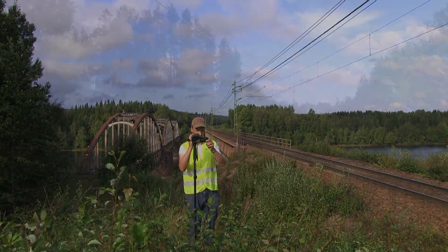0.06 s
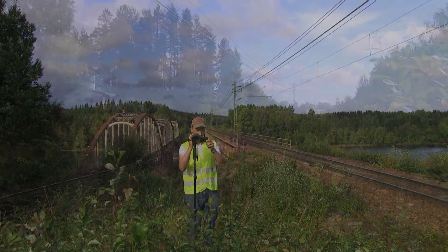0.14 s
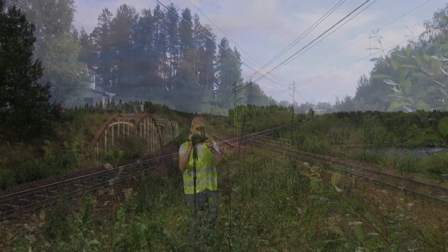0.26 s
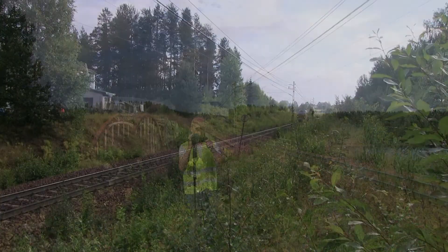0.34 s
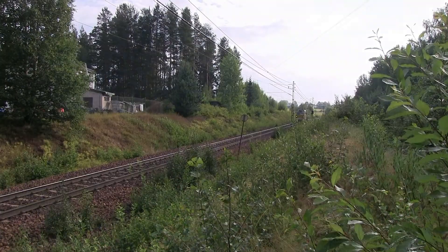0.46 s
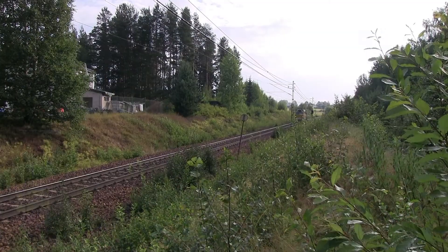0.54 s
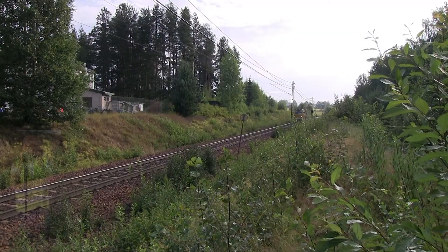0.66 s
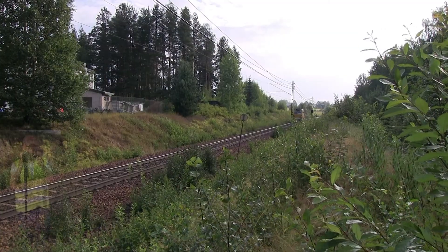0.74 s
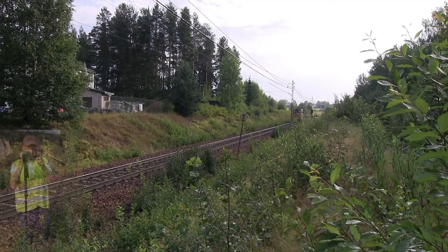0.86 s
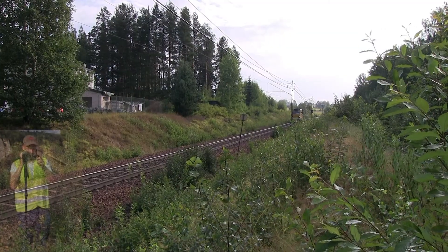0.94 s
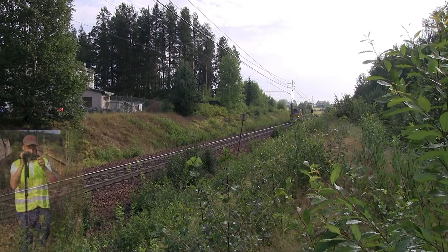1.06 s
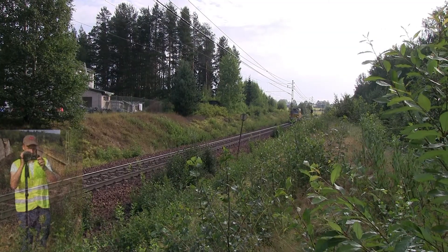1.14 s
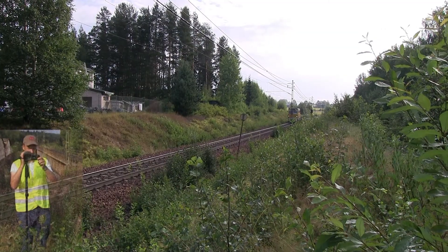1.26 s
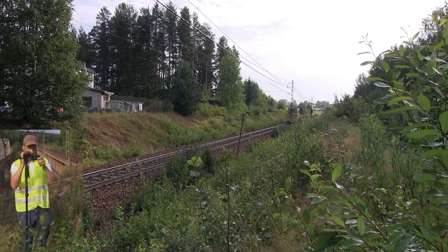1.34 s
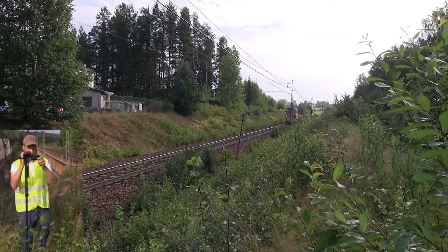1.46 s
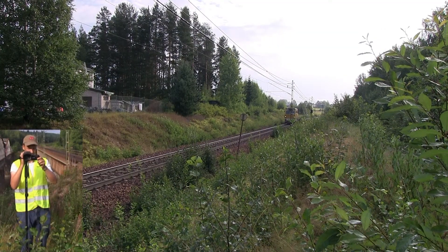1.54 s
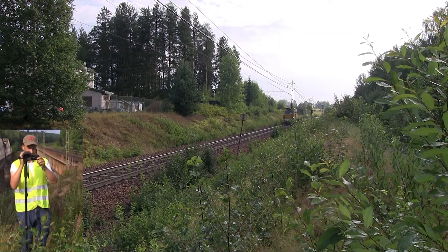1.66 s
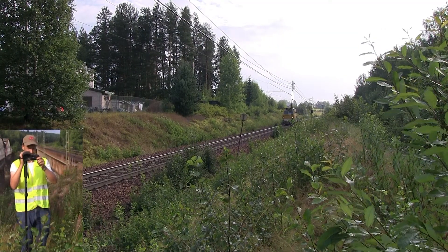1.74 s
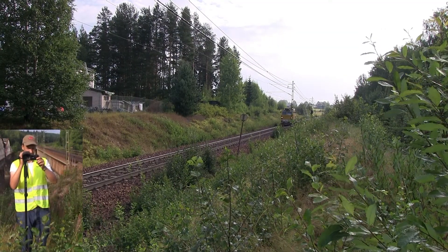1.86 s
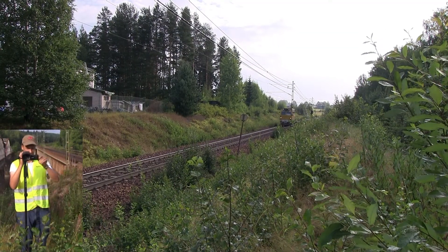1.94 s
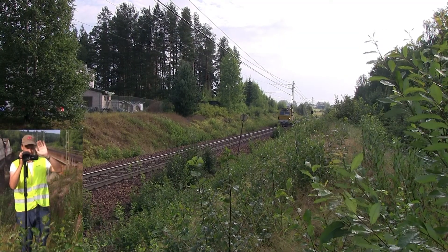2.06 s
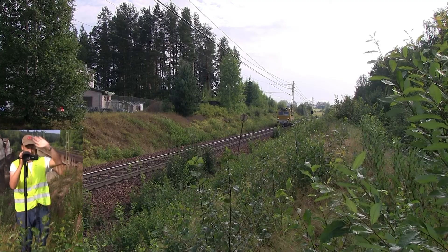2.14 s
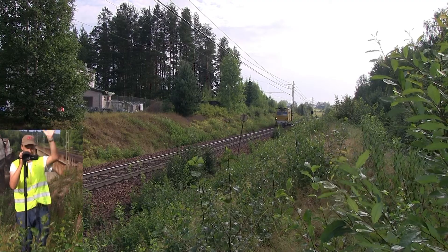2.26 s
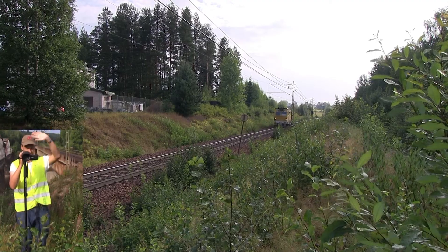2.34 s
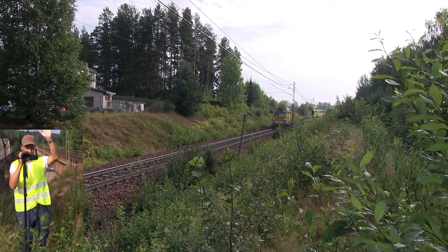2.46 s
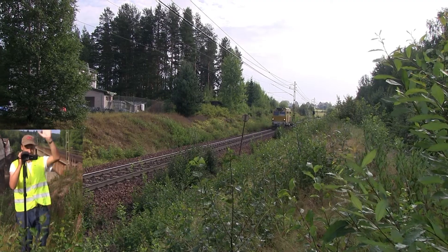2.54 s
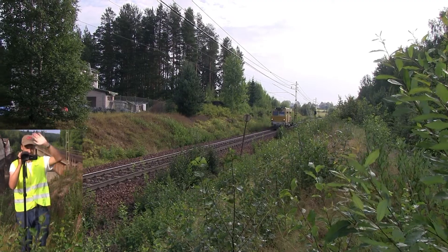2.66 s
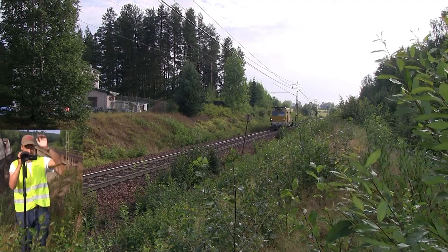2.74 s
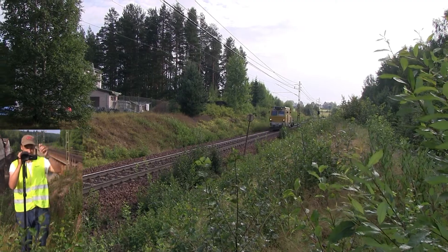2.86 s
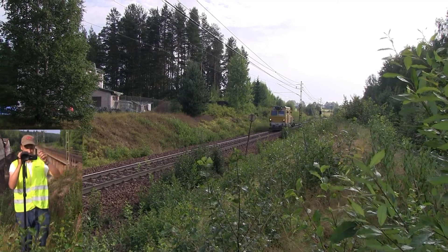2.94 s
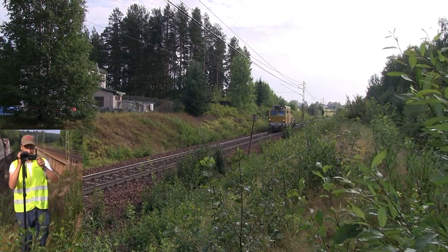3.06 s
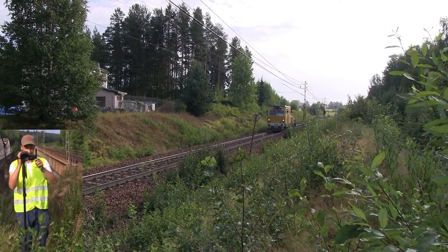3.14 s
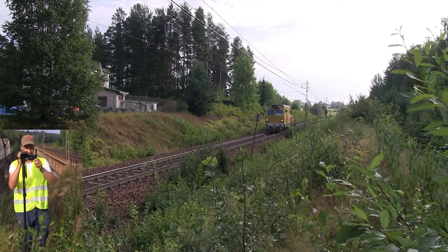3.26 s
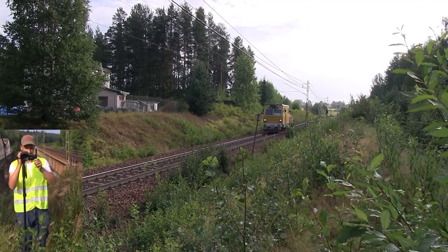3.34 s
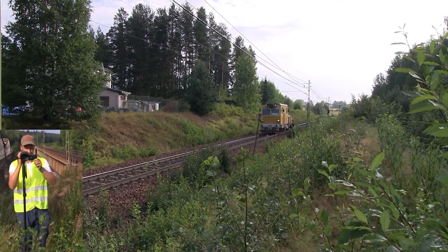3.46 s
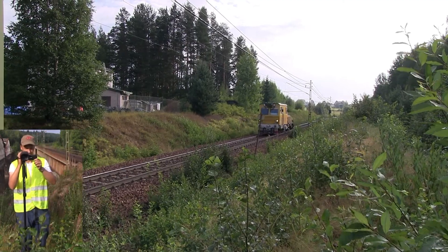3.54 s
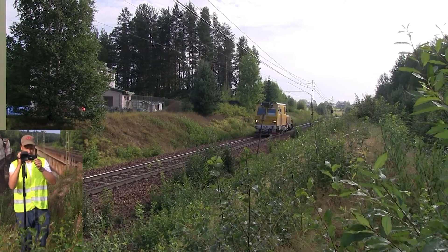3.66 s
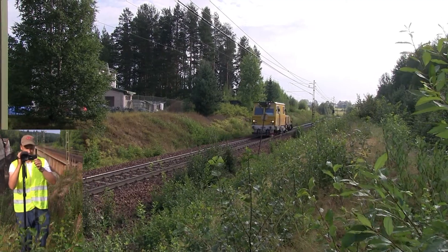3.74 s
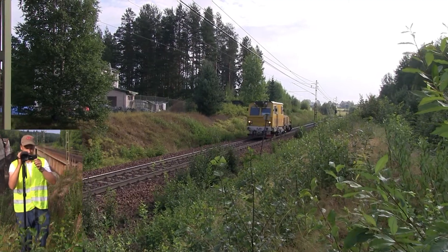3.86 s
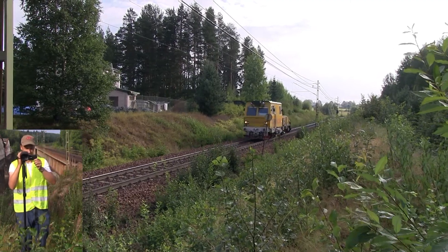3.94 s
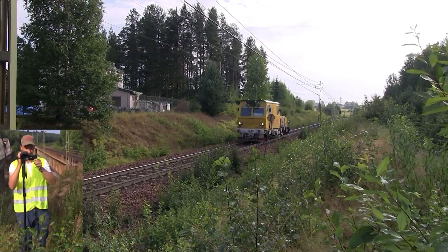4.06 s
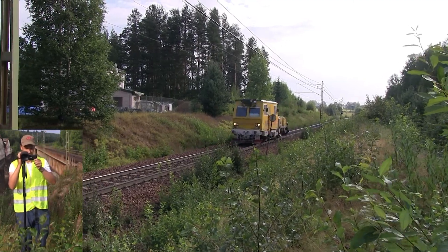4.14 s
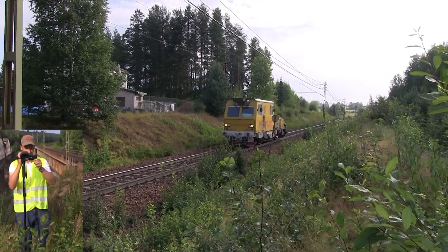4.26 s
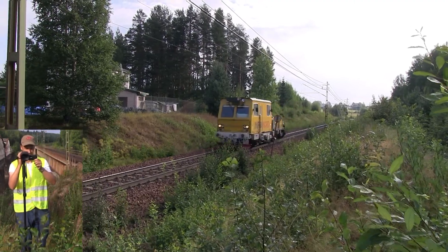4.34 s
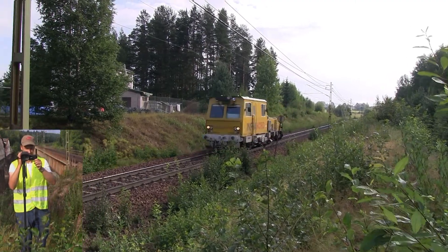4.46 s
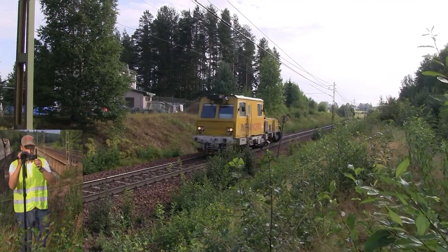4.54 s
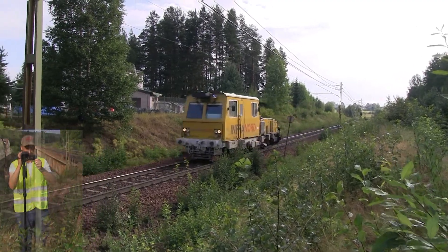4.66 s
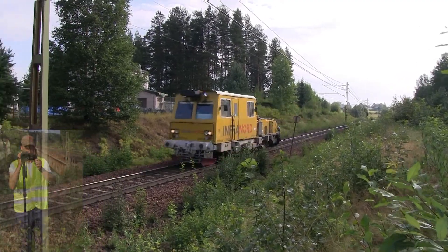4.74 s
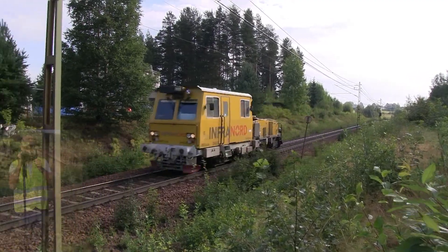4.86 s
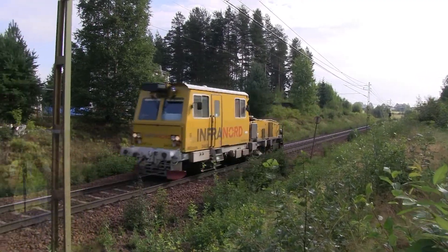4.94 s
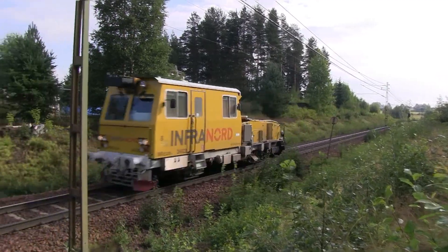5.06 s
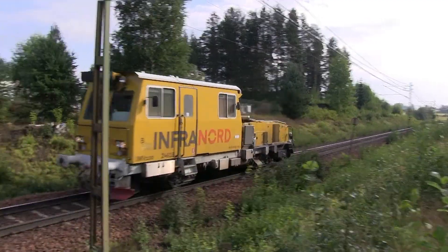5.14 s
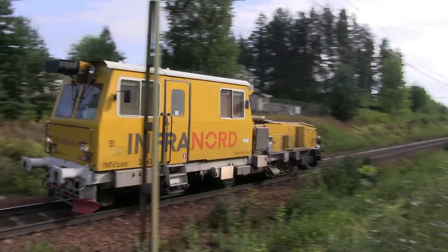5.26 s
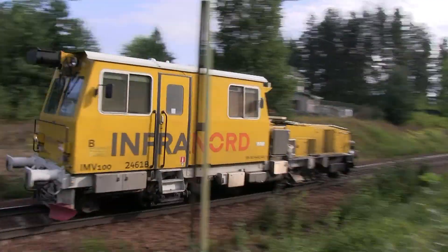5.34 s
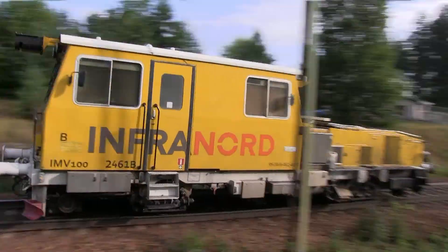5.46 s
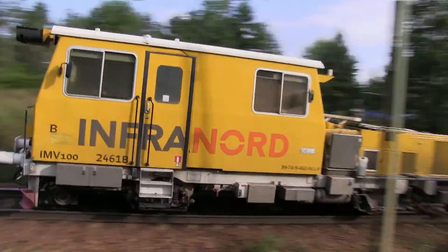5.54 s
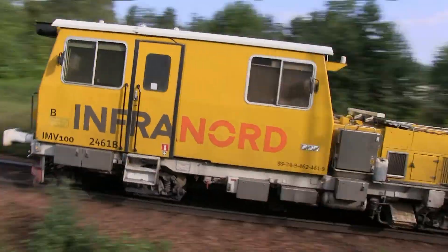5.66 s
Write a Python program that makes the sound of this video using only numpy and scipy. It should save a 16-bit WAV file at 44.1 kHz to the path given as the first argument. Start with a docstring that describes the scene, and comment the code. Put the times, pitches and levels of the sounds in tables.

```python
"""A diesel track railcar approaches along a wooded cutting: first a throbbing engine hum of sines at
multiples of two rates, wheel roar, singing rails and a high chirr of shaped noise, over faint open-air hiss.
The engine eases off, gear whines come and go as wavering sines, and the rails ping once as a falling chirp.
Three short toots follow on two horns, each a stack of harmonics, and the trees throw them back.
Engine, wheels, singing rails and chirr swell as the distance shrinks, until the car draws level."""
import sys
import numpy as np
from scipy import signal
from scipy.fft import rfft, irfft, next_fast_len
from scipy.io import wavfile
from scipy.ndimage import uniform_filter1d, map_coordinates

SR = 44100
rng = np.random.default_rng(int(sys.argv[2]) if len(sys.argv) > 2 else 0)


def generate_wav(sig):
    """Save sig (samples, or channels by samples) to the path in sys.argv[1] as 16-bit PCM at SR."""
    pcm = np.round(np.clip(np.atleast_2d(sig).T, -1, 1) * 32767).astype(np.int16)
    wavfile.write(sys.argv[1], SR, pcm)


N = 251370

# the pass: the car's speed, its nearest distance and the moment it draws level
SPEED_M_PER_S, NEAREST_M, LEVEL_AT_S = 17.36, 6.77, 5.425

# faint steady hiss of the open air: its level and its spectrum [f/Hz, level/dB]
AIR_DB = -65
AIR_SPECTRUM = [(500, 0), (2000, 2), (4500, -10), (8000, -7), (12000, -1), (14500, -9)]

# the high chirr: its level when the car is nearest, and its loss along the track
CHIRR_DB, CHIRR_LOSS_DB_PER_M = -44, 0.23
# spectrum of the chirr [f/Hz, level/dB]
CHIRR_SPECTRUM = [(1000, -45), (3500, -21), (5800, -14), (6400, 0), (6800, -1), (7300, -10), (7750, -8),
                  (8300, -17), (9700, -15), (11800, -19), (14300, -28)]
# thin lines in the chirr [f/Hz, width/Hz, level/dB]
CHIRR_LINES = [(6360, 90, 2), (6550, 90, -2), (9650, 90, -6), (10880, 90, -7), (11800, 70, -8)]

# sources on the car: level when nearest, and loss for each doubling of the distance
EXHAUST_DB, EXHAUST_LOSS_DB = -17.5, 7.5
DRONE_DB, DRONE_LOSS_DB = -22, 5.5
SHAFT_DB, SHAFT_LOSS_DB = -32, 3.8
ROAR_DB, ROAR_LOSS_DB = -17.5, 6.5
RUMBLE_DB, RUMBLE_LOSS_DB = -29.5, 7.0
HISS_DB, HISS_LOSS_DB = -22.5, 7.6

# engine rates over time [t/s, firing f/Hz, shaft f/Hz]
ENGINE_RATES = [(0, 101.2, 40.6), (.8, 100.5, 40.6), (2.2, 99.3, 40.5), (4, 98, 40.5), (5, 96.8, 40.35),
                (5.7, 95.7, 40)]
IN_STEP_AT_S = 5.235  # exhaust and drone are in step at this moment
# the engine pulls at first, then eases off: when, how fast, and what the load adds to exhaust and drone
EASE_AT_S, EASE_S, LOAD_EXHAUST_DB, LOAD_DRONE_DB = 1.08, 0.51, 12.5, -8
DRONE_LEAD_S = 0.47  # the drone comes up this much before the exhaust drops
# the bank screens the engine until the car comes clear of it: when, how fast, by how much
CLEAR_AT_S, CLEAR_S, SCREEN_DB = 3.3, .35, -4
# exhaust overtones [multiple of the firing rate, level/dB before they open up]
EXHAUST_OVERTONES = [(2, -12), (3, -15.5), (4, -24)]
# overtones of the drone [multiple of the shaft rate, level/dB]
DRONE_OVERTONES = [(2.879, -17), (2.999, -14), (3.851, -14.5)]

# low shake of the track bed under the wheels [f/Hz, level/dB]
RUMBLE_SPECTRUM = [(20, -16), (35, -7), (60, -3), (130, -3), (220, -20.5), (400, -49), (800, -100)]
# rolling roar [f/Hz, level/dB]
ROAR_SPECTRUM = [(74, -35), (125, -11.5), (260, -6.5), (345, -4), (377, -1), (408, -9), (456, -0.5),
                 (638, -4.5), (754, 1), (815, -8.5), (932, -4), (1260, -17), (1460, -10.5), (1800, -16.5),
                 (2340, -55), (3960, -120)]
# rolling hiss [f/Hz, level/dB]
HISS_SPECTRUM = [(760, -29), (1300, -6.5), (1480, -7.5), (1670, -16.5), (1910, -6), (2260, -9.5),
                 (2860, -9), (3830, -17), (4190, -16), (5030, -20), (6600, -20.5), (8240, -30.5),
                 (11800, -47), (14500, -66)]
# panels and bogies ringing within the roar [f/Hz, width/Hz, level/dB]
BODY_MODES = [(157.2, 12, -3.5), (480.5, 33, 4), (1039, 44, -4), (1370, 19, -9), (1524, 45, -11),
              (2947, 60, -8), (4200, 80, -16)]

# the singing rails: level when the car is nearest, and loss along the track
SINGING_DB, SINGING_LOSS_DB_PER_M = -25, 0.0544
# rail song, with stop bands between its pass bands [f/Hz, level/dB]
RAIL_SPECTRUM = [(25, -24), (60, -18), (130, -25), (255, -27), (320, -12), (420, 1), (438, -2), (452, -22),
                 (482, -5), (592, -6), (610, -20), (640, -8), (900, -11), (1110, -7), (1368, -11),
                 (1398, -30), (2800, -39), (5000, -51), (14000, -80)]
# sharpest resonances of the rails [f/Hz, width/Hz, level/dB]
RAIL_RESONANCES = [(405.1, 9, -1.5), (430, 35, -2.5), (517.9, 9.2, -3.5)]
# wheel knocks on the track [t/s, level/dB before the common trim]
WHEEL_KNOCKS = [(.045, -29), (.39, -31), (.45, -26), (.52, -28), (1.76, -29), (4.088, -20.5), (5.49, -22)]
KNOCK_TRIM_DB = -2
# the rails' answer to a knock [f/Hz, level/dB]
CLONK_SPECTRUM = [(60, -40), (300, -14), (410, 2), (460, -11), (700, -7), (1100, -7), (1370, -8),
                  (1420, -26), (2150, -31), (3000, -40), (6000, -56), (14000, -85)]

# gear tones riding on the engine speed
# [opening t/s, end t/s, multiple of the firing rate, level/dB before the common trim]
GEAR_TONES = [(1.1, 1.9, 7.99, -36), (2.15, 2.78, 7.95, -35), (2.08, 2.2, 7.04, -34),
              (3.6, 5.4, 7.08, -32.5), (4.52, 4.7, 10.9, -31), (4.9, 5.45, 7.71, -28),
              (5.3, 5.8, 3.975, -25), (5, 5.65, 4.7, -29), (4.9, 5.5, 15.7, -37), (4.95, 5.8, 30.5, -37)]
WHINE_TRIM_DB, WHINE_WAVER = 0.26, 0.00521  # common trim, and the share by which the pitch wavers

# chirps that make up the ping [arrival of 1 kHz t/s, level/dB, travel time of 1 kHz t/s]
RAIL_PINGS = [(2.0665, -2.7, .036), (2.075, -9.7, .045)]
# strength of the ping at each pitch [f/Hz, level/dB]
PING_COLOUR = [(290, -45), (370, -14), (450, -13), (560, -17), (750, -7), (1000, 0), (1230, -1),
               (1400, -12), (1600, -29), (2300, -36)]

# the toots at the horns [t/s, length/s, level/dB]
HORN_TOOTS = [(2.782, 0.043, -11.5), (3.246, .054, -11.5), (3.462, 0.057, -10.5)]
# the two horns [settled f/Hz, lag before it speaks t/s, share by which it starts sharp]
HORN_REEDS = [(411.5, 0, .07), (385.5, .004, .19)]
# first harmonics, one row each [high horn level/dB, low horn level/dB]
HORN_HARMONICS = [(-8, -11), (-4, 1), (-6, -10), (-4, -10), (-11, -5), (0, -5), (-4, -10), (-6, -5),
                  (-12, -10)]
# overtones above those [f/Hz, level/dB]
HORN_BLARE = [(3700, -13), (4500, -17), (5500, -17), (7200, -21.5), (8200, -31.5), (9500, -43),
              (12000, -57), (14500, -56)]

# echoes from the trees: the first and strongest comes from beside the track, the last from behind the car
ECHO_FIRST_S, ECHO_LAST_S, ECHO_DB, ECHO_FADE_DB = .022, .24, -11, -11
ECHO_FIRST_RATIO, ECHO_PITCH_DROP = 0.98, .16  # the moving horn reaches the trees at a lower pitch
# time for the trees' reflections to die by 60 dB [f/Hz, t60 t/s]
TREE_DECAY = [(300, 0.82), (1500, 0.98), (3000, 0.71), (7000, 0.92), (13000, 0.88)]

FADE_IN_S, FADE_FROM_DB = .4, -10.5
TOP_HZ = 14500


def amp(db):
    """Decibels to gain."""
    return 10 ** (np.asarray(db) / 20)


def unit(x):
    """Scaled to rms 1."""
    return x / np.sqrt(np.mean(x ** 2) + 1e-20)


def along(points, hz):
    """(Hz, value) points read on a log frequency axis."""
    f, v = np.transpose(points)
    return np.interp(np.log(hz + 1), np.log(f + 1), v)


def clock():
    """The time of each sample in seconds."""
    return np.arange(N) / SR


def curves(rows):
    """One value per sample for each column after the time."""
    s, *columns = np.transpose(rows)
    return [np.interp(clock(), s, column) for column in columns]


def wobble(rate):
    """A smooth random curve, rate knots a second."""
    knots = rng.standard_normal(int(N * rate / SR) + 4)
    return map_coordinates(knots, [clock() * rate])


def turns(hz):
    """The phase of a moving frequency, from a random start."""
    return 2 * np.pi * (np.cumsum(hz) / SR + rng.random())


def gate(start, end, rise, fall):
    """Opens smoothly after start and closes smoothly after end."""
    t = clock()
    opening = np.clip((t - start) / rise, 0, 1)
    closing = np.clip(1 - (t - end) / fall, 0, 1)
    return np.sin(np.pi / 2 * opening * closing) ** 2


def filtered(x, response):
    """x shaped by a response of frequency."""
    m = next_fast_len(N + SR // 2)
    return irfft(rfft(x, m) * response(np.fft.rfftfreq(m, 1 / SR)), m)[..., :N]


def pan(x, left_db):
    """Stereo with the left side louder by left_db."""
    return x * np.array([amp(left_db / 2), amp(-left_db / 2)]).reshape(2, -1)


def widen(mid, side, side_db):
    """Left and right from a middle and a side signal."""
    return np.array([mid + amp(side_db) * side, mid - amp(side_db) * side])


def rush(spectrum, side_db, patchy_db):
    """Stereo noise of rms 1 with patches of random gain in time and pitch."""
    z = signal.stft(rng.standard_normal((2, N)), nperseg=1024)[2]
    field = uniform_filter1d(rng.standard_normal(z.shape[1:]), size=5, axis=0)
    field = uniform_filter1d(field, size=7, axis=1)
    pair = signal.istft(z * amp(patchy_db * unit(field)), nperseg=1024)[1][:, :N]
    # the last factor rolls off the lowest bass
    mid, side = filtered(pair, lambda hz: amp(along(spectrum, hz)) * hz ** 2 / (hz ** 2 + 40 ** 2))
    return unit(widen(mid, side, side_db))


def ringing(modes):
    """Noise of rms 1 through a few resonances."""
    def response(f):
        return sum(amp(db) / np.sqrt(w) * (1j * f * w / (c * c - f * f + 1j * f * w)) ** 2
                   for c, w, db in modes)
    return unit(filtered(rng.standard_normal(N), response))


def scatter(x, t60s, build, side_db):
    """Reflections build up, then each frequency dies at its own speed."""
    hz, t, z = signal.stft(rng.standard_normal((2, SR)), SR, nperseg=256)
    decay = amp(-60 * t / along(t60s, hz)[:, None])
    tail = signal.istft(z * decay * (1 - np.exp(-t / build)), SR, nperseg=256)[1]
    mid, side = signal.fftconvolve(x[None], tail / np.linalg.norm(tail[0]), axes=1)[:, :N]
    return widen(mid, side, side_db)


def distance():
    """Metres from the car to the microphone."""
    return np.hypot(NEAREST_M, SPEED_M_PER_S * (clock() - LEVEL_AT_S))


def through_air(near_db, loss_db):
    """Level in dB of a source on the car: it loses loss_db for each doubling of the distance."""
    return near_db - loss_db * np.log2(distance() / NEAREST_M)


def along_track(near_db, loss_db_per_m):
    """Level in dB of a sound that loses the same for every metre of distance."""
    return near_db - loss_db_per_m * (distance() - NEAREST_M)


def load(until):
    """1 while the engine pulls, falling to 0 as it eases off."""
    return np.clip(1 - (clock() - until) / EASE_S, 0, 1)


def air():
    """Steady shaped noise: the faint hiss under everything."""
    return amp(AIR_DB) * pan(rush(AIR_SPECTRUM, side_db=-11, patchy_db=0), left_db=1.5)


def chirr():
    """A high chirr along the track, noise with thin resonant lines, grows as the car nears."""
    sizzle = rush(CHIRR_SPECTRUM, side_db=-11, patchy_db=2.0) + amp(-9.5) * ringing(CHIRR_LINES)
    level_db = along_track(CHIRR_DB, CHIRR_LOSS_DB_PER_M) + .5 * wobble(25)
    return amp(level_db) * pan(sizzle, left_db=2.0)


def overtones(phase, orders):
    """Sines at multiples of a phase, each wavering in level."""
    return sum(amp(db + 1.6 * wobble(9)) * np.sin(k * phase + 2 * np.pi * rng.random())
               for k, db in orders)


def engine():
    """The exhaust note beats against the drone of the drive, so the hum throbs."""
    exhaust_db = through_air(EXHAUST_DB, EXHAUST_LOSS_DB) + LOAD_EXHAUST_DB * load(EASE_AT_S)
    drone_db = through_air(DRONE_DB, DRONE_LOSS_DB) + LOAD_DRONE_DB * load(EASE_AT_S - DRONE_LEAD_S)
    phases = [turns(hz) for hz in curves(ENGINE_RATES)]
    firing, shaft = [phase - np.interp(IN_STEP_AT_S, clock(), phase) for phase in phases]

    open_db = along_track(near_db=1.0, loss_db_per_m=0.07)  # overtones come through as the car nears
    exhaust = np.sin(firing) + amp(open_db) * overtones(firing, EXHAUST_OVERTONES)
    # a line halfway between the two makes every second throb stronger
    halfway = amp(-5.5) * np.sin(firing / 2 + shaft)
    drone = np.sin(2 * shaft) + halfway + overtones(shaft, DRONE_OVERTONES)
    hum = amp(exhaust_db + 0.39 * wobble(7.4)) * exhaust + amp(drone_db + 0.85 * wobble(6.14)) * drone

    shaft_db = through_air(SHAFT_DB, SHAFT_LOSS_DB) + 1.3 * wobble(6)
    fundamental = amp(shaft_db) * np.sin(shaft + np.array([[.4], [-.4]]))  # phase apart left to right
    screen = amp(SCREEN_DB * np.clip(1 - (clock() - CLEAR_AT_S) / CLEAR_S, 0, 1))
    return pan(screen * hum, left_db=9.5) + pan(fundamental, left_db=-.6)


def wheels():
    """Rolling contact roars, hisses, rings the body and shakes the track bed."""
    jolt = wobble(15)  # shared by roar and hiss
    rolling = rush(ROAR_SPECTRUM, side_db=-12.5, patchy_db=1.4) + amp(-11.5) * ringing(BODY_MODES)
    roar = amp(through_air(ROAR_DB, ROAR_LOSS_DB) + 0.53 * jolt) * rolling
    hiss_db = through_air(HISS_DB, HISS_LOSS_DB) + .5 * jolt
    hiss = amp(hiss_db) * rush(HISS_SPECTRUM, side_db=-7.5, patchy_db=0.83)
    rumble_db = through_air(RUMBLE_DB, RUMBLE_LOSS_DB)
    rumble = amp(rumble_db) * rush(RUMBLE_SPECTRUM, side_db=-13, patchy_db=1.5)
    return pan(rumble, left_db=10) + pan(roar, left_db=3.5) + pan(hiss, left_db=0.0)


def rails():
    """Bending waves run far ahead in the steel and radiate in its pass bands; knocks add short clonks."""
    song = amp(-3.0) * rush(RAIL_SPECTRUM, side_db=-8.5, patchy_db=3)
    song = song + amp(-7.0) * ringing(RAIL_RESONANCES)
    singing = amp(along_track(SINGING_DB, SINGING_LOSS_DB_PER_M) + 0.86 * wobble(14)) * song
    blows = sum(amp(db) * gate(s - .02, s + .01, rise=.012, fall=.06) for s, db in WHEEL_KNOCKS)
    knocks = amp(KNOCK_TRIM_DB) * blows * rush(CLONK_SPECTRUM, side_db=-16, patchy_db=2.5)
    return pan(singing + knocks, left_db=6.0)


def gears():
    """Wavering tones come and go, sinking in pitch with the engine note."""
    firing_hz = curves(ENGINE_RATES)[0]
    whine = np.zeros(N)
    for start, end, multiple, db in GEAR_TONES:
        hz = multiple * firing_hz * (1 + WHINE_WAVER * wobble(80))
        level = amp(db + 3 * wobble(22)) * gate(start, end - .02, rise=.02, fall=.03)
        whine += level * np.sin(turns(hz))
    return amp(WHINE_TRIM_DB) * pan(whine, left_db=8.5)


def ping():
    """Bending waves travel as the root of their frequency, so a click arrives as a falling chirp."""
    out = np.zeros(N)
    for s, db, travel in RAIL_PINGS:
        age = np.maximum(1 + (clock() - s) / travel, .5)  # time since the click, in travel times
        hz = 1000 / age ** 2
        strength = uniform_filter1d(amp(db + along(PING_COLOUR, hz)), size=150)
        out += strength * gate(s - .01, s + .033, rise=.005, fall=.012) * np.sin(turns(hz))
    return pan(out, left_db=4.0)


def reed(t, hz, sharp, harmonics, doppler):
    """One horn's harmonics, starting sharp and settling, with a fluttering pitch."""
    flutter = map_coordinates(rng.standard_normal(200), [t * 700], mode="wrap")
    settle = 1 + sharp * np.exp(-t / .011)
    phase = turns(doppler * hz * settle * (1 + 0.0061 * flutter))
    k = np.arange(1, 36)
    levels = np.concatenate([harmonics, along(HORN_BLARE, hz * k[len(harmonics):])])
    levels = levels + rng.standard_normal(len(k)) * np.where(k > len(harmonics), 3.5, 1.5)
    return amp(levels) @ np.sin(k[:, None] * phase + 2 * np.pi * rng.random((len(k), 1)))


def horns(doppler, delay):
    """Two reeds start sharp and settle within each toot; air-jet noise roughens them."""
    out = np.zeros(N)
    jet_band = signal.butter(2, [800, 3600], "band", fs=SR, output="sos")
    for s, length, db in HORN_TOOTS:
        t = np.arange(int((length + 0.025) * SR)) / SR  # room for the release
        toot = np.zeros(len(t))
        for (hz, lag, sharp), harmonics in zip(HORN_REEDS, np.transpose(HORN_HARMONICS)):
            toot += reed(t, hz, sharp, harmonics, doppler) * np.clip((t - lag) / 0.011, 0, 1)
        jet = signal.sosfilt(jet_band, rng.standard_normal(SR // 4))[:len(t)]
        valve = np.clip(t / 0.0048, 0, 1) * np.clip((t[-1] - t) / 0.034, 0, 1) ** 1.17
        blast = unit(unit(toot) + amp(-9.5) * unit(jet))
        out[round((s + delay) * SR):][:len(t)] += amp(db) * valve * blast
    return out


def echoes(count):
    """The further round behind the car a tree stands, the later, weaker and lower its echo."""
    out = np.zeros(N)
    for behind in np.linspace(0, 1, count):
        delay = ECHO_FIRST_S + (ECHO_LAST_S - ECHO_FIRST_S) * behind ** 2
        ratio = ECHO_FIRST_RATIO - ECHO_PITCH_DROP * behind
        out += amp(ECHO_DB + ECHO_FADE_DB * behind) * horns(ratio, delay)
    return out


def scene():
    """The railcar, the track, and the horns with their echoes from bank and trees."""
    toots = horns(doppler=1, delay=0)
    bank = amp(-13) * scatter(toots, [(1000, .04)], build=.002, side_db=0)
    trees = scatter(echoes(count=6), TREE_DECAY, build=0.0035, side_db=-5.5)
    signals = pan(toots + bank, left_db=-1.0) + pan(trees, left_db=-1.5)
    return air() + chirr() + engine() + wheels() + rails() + gears() + ping() + signals


def record(dry):
    """The sound fades in, its highest peaks are rounded off, and nothing is kept above TOP_HZ."""
    faded = dry * np.interp(clock(), [0, FADE_IN_S], [amp(FADE_FROM_DB), 1])
    soft = faded / (1 + np.abs(faded / .95) ** 6) ** (1 / 6)
    return filtered(soft, lambda hz: hz < TOP_HZ)


dry = scene()
out = record(dry)
generate_wav(out)
```